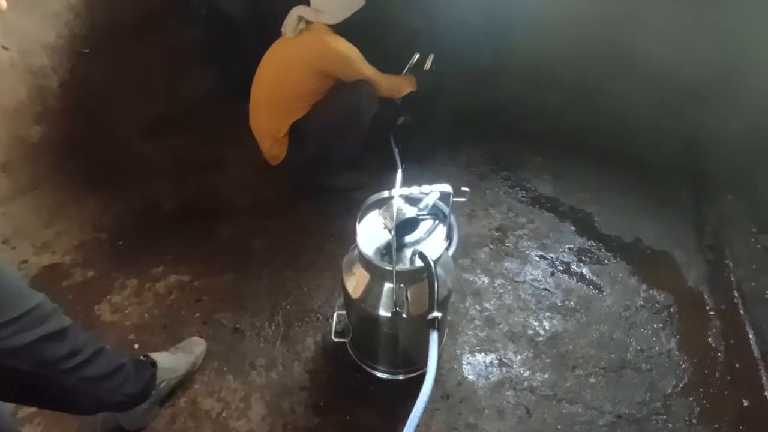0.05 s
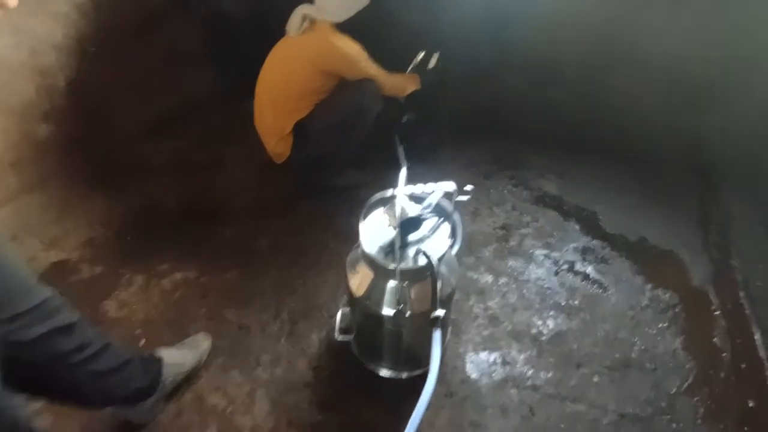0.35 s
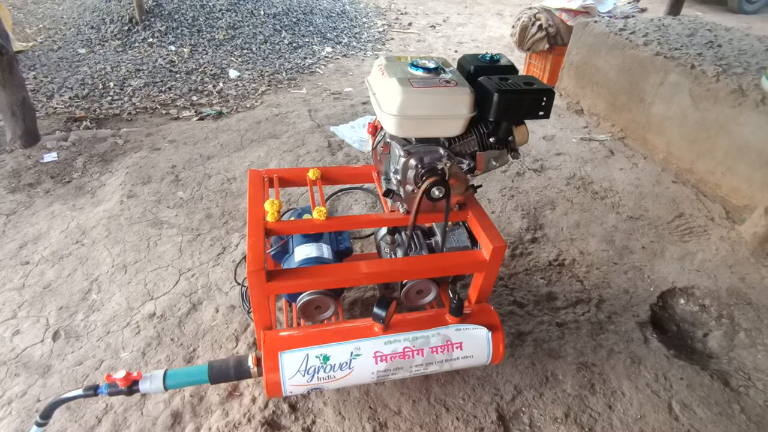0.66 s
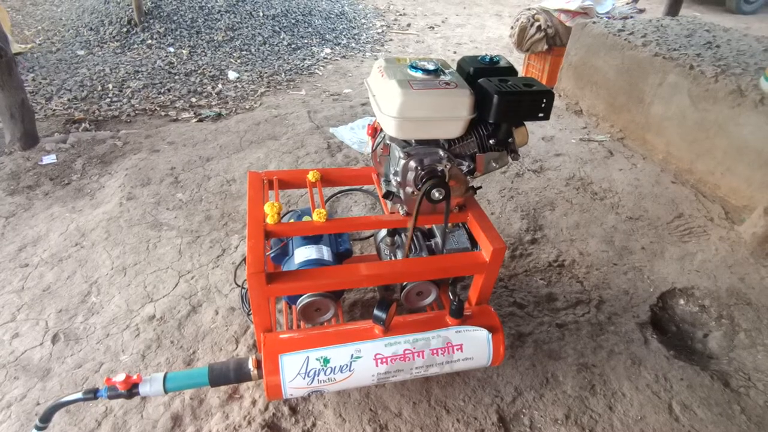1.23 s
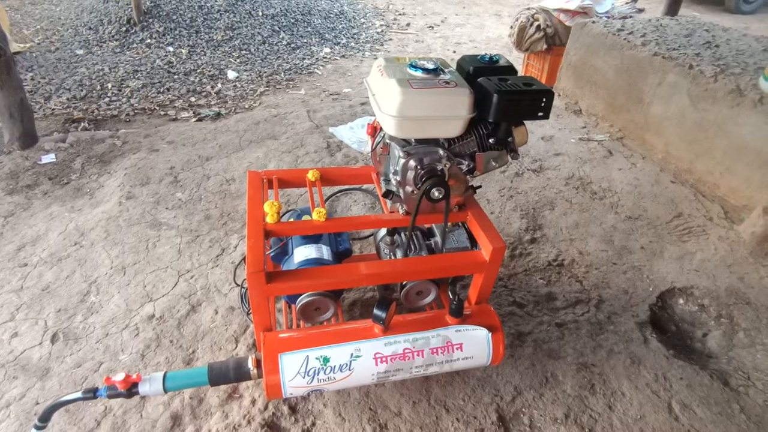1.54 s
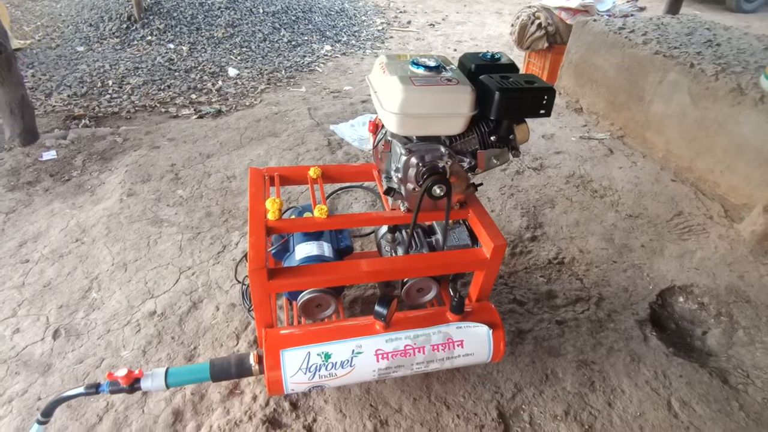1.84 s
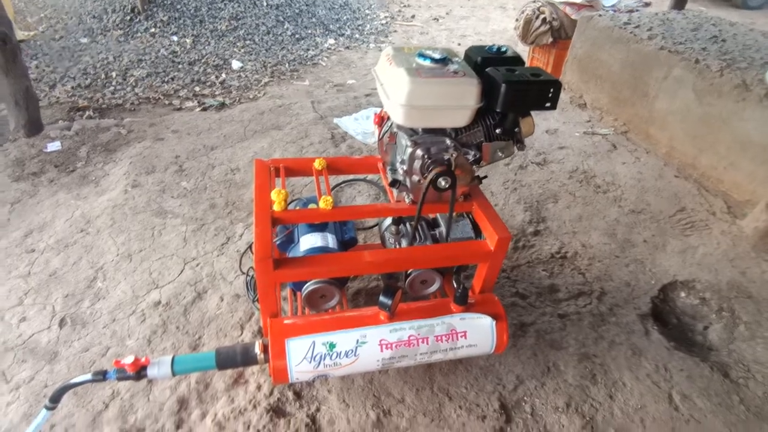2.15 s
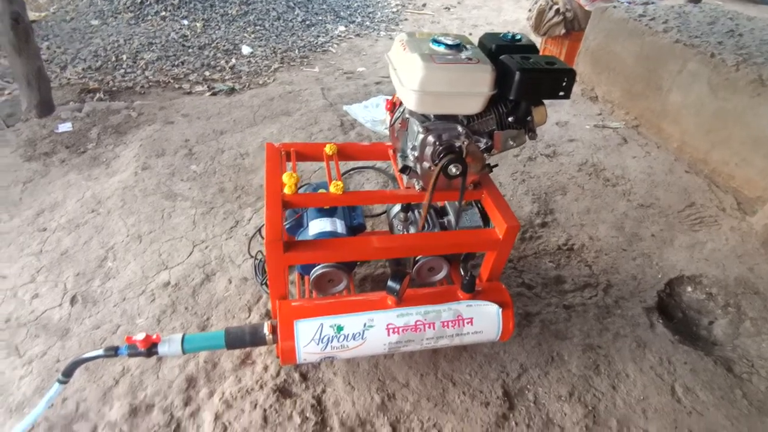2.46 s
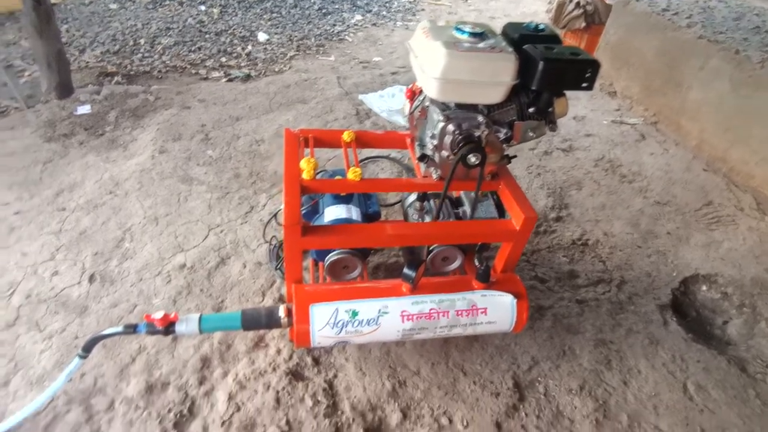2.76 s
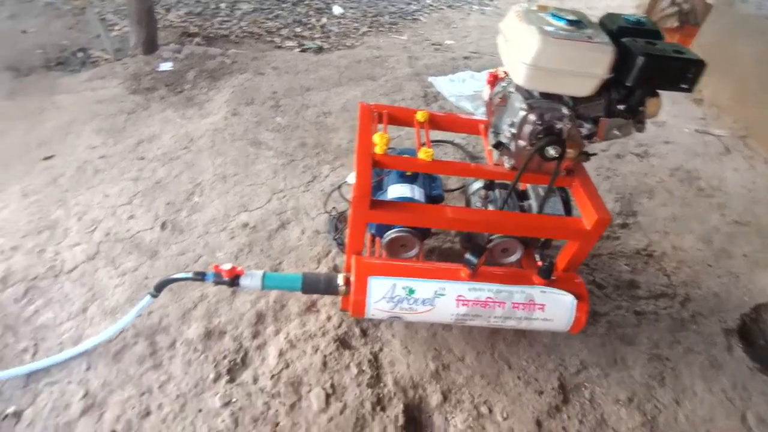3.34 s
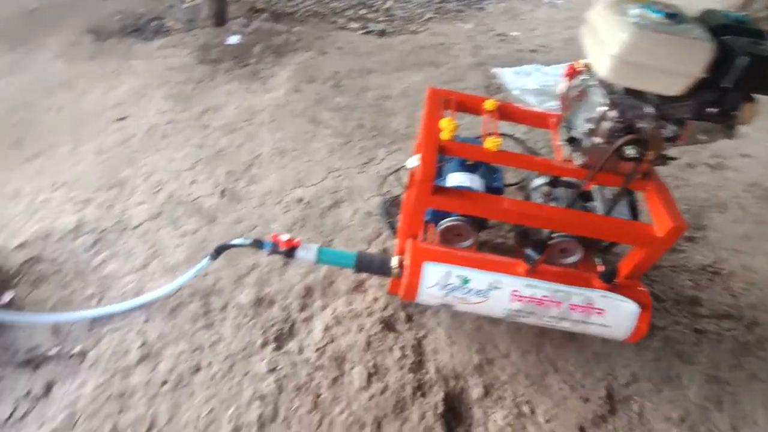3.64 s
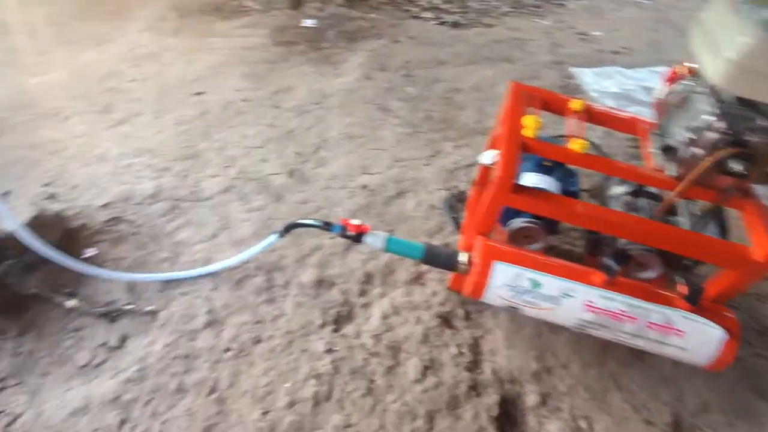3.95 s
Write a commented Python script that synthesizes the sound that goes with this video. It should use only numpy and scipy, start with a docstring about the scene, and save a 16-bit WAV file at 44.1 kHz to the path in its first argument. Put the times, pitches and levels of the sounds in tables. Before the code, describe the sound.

Loud, steady chugging of a small engine and pump cuts in after a short echoing clack.

```python
"""First a clack echoes in a milking shed and air hisses into a teat cup, the engine muffled by the wall.
Then a hard cut to the yard, next to the machine: a single-cylinder four-stroke chugs at governed speed.
Exhaust and intake puffs make its drone and rumble; valves and piston clatter and ring the covers.
It drives a vacuum pump whose tones beat slowly against the engine's own."""
import sys
import numpy as np
from scipy import signal
from scipy.fft import rfft, irfft, next_fast_len
from scipy.io import wavfile
from scipy.ndimage import map_coordinates

SR = 44100
rng = np.random.default_rng(int(sys.argv[2]) if len(sys.argv) > 2 else 0)


def to_wav(s):
    """Save 16-bit WAV."""
    ch = np.atleast_2d(s).T  # columns
    pcm = np.round(np.clip(ch, -1, 1) * 32767)  # PCM
    wavfile.write(sys.argv[1], SR, pcm.astype(np.int16))


N = 176400
CUT_S, FIRING_AT_S = .3805, .3822  # the cut to the yard; the firing that anchors the cycle

# Engine speed. Each row: time in seconds, firings per second.
FIRING_RATE = [(0.4, 21.027), (1.3, 21.129), (1.5, 21.231), (1.72, 21.01), (1.93, 21.177), (2.08, 21.115),
               (2.4, 21.235), (2.9, 21.179), (3.08, 21.105), (3.3, 21.244), (3.85, 20.99)]
# The drone's tones. Each row: multiple of the firing rate, base level in dB.
ENGINE_TONES = [(1, -42.9), (2, -34.9), (3, -47.7), (4, -36), (5, -32.1), (6, -35.9), (7, -47.8),
                (8, -34.5), (9, -41.9), (10, -37.3), (11, -42.0), (12, -32.6), (13, -45.7), (14, -37.7),
                (15, -30.8), (16, -38.7), (17, -42.9), (18, -37.9), (19, -36.1), (20, -45.4), (21, -42.8),
                (22, -42.2), (23, -43.9), (24, -35.3), (25, -41.0), (26, -40.8), (27, -36.8), (28, -36.3),
                (29, -41.6), (30, -44.1), (31, -42.9), (32, -44.1), (33, -40.0), (34, -36.9), (35, -41.5),
                (36, -43.9), (37, -39.4), (38, -43.4), (41, -50), (42, -50), (43, -45), (45, -47),
                (50, -41), (53, -46), (54, -44), (56, -48)]
# Exhaust and intake pushes. Each row: place in the cycle (0-1), signed size, ring in Hz, width in Hz.
PUFFS = [(-.002, .8, 230, 500), (.008, 2.4, 737, 109), (0.29, -1.1, 257, 147), (.306, -.9, 383, 169),
         (.657, 0.97, 135, 65), (.355, -1.8, 592, 15)]
# The silencer's boom as the listener moves. Each row: time in seconds, gain in dB.
BOOM_RIDE = [(.4, 1), (.9, 2.5), (1.5, 0), (2.2, 1.5), (2.7, -1.5), (3.3, -4), (4, -3)]
# Where the boom sits. Each row: frequency in Hz, share of that gain.
BOOM_BAND = [(200, 0.11), (300, 0.33), (430, 0.8), (500, 0.18)]
# Pump tones. Each row: multiple of the pump rate, level in dB, time of a dip in the beat in seconds.
PUMP_TONES = [(1, -36, .45), (2, -35.5, 1.3), (3, -43.7, 0.98), (6, -38, 1.07), (7, -38.5, 0.85)]
# Gas in the silencer and air box. Each row: frequency in Hz, relative level in dB.
RUMBLE_EQ = [(30, -20), (120, -10), (230, -8), (310, -2), (360, -6), (590, -0.5), (660, -5), (720, -2),
             (850, -7), (1010, -2.5), (1200, -5), (1450, -3), (1750, -3.5), (2200, -10), (2800, -24),
             (5000, -67)]
# Surges of that gas. Each row: place in the cycle, size, decay in seconds.
SURGES = [(0, 0.82, .005), (0.311, 0.72, 0.022)]
# Noise of the block. Each row: frequency in Hz, left and right relative levels in dB.
CLATTER_EQ = [(100, -72, -70), (1500, -37.5, -39), (2370, -4, -8.5), (2720, -8, -12), (3170, -6, -3),
              (3860, -7, -1.5), (4420, -8.5, -1), (5120, -10.5, -2.3), (5830, -13.5, -11), (6980, -14, -22),
              (8400, -11.5, -26), (10050, -19.5, -21), (11600, -26.5, -27), (15200, -28.5, -28.5)]
# Valve and piston knocks. Each row: place in the cycle, size, decay in seconds.
KNOCKS = [(.05, 0.92, 0.0079), (.25, 0.3, .009), (0.326, 0.94, .002), (.365, 1.15, 0.0017),
          (.43, .85, .001), (.5, 0.5, 0.009), (.67, .65, .001), (.86, .6, 0.0017)]
# The clatter as the listener moves. Each row: time in seconds, level in dB.
CLATTER_RIDE = [(.4, -23), (1.2, -22), (2.1, -22.5), (2.9, -23.3), (3.5, -24), (4, -26.3)]
# Cover rings. Each row: pitch in Hz, relative level in dB, t60 in seconds, lean to the right in dB.
COVER_MODES = [(1062, -9, .05, 0), (1360, -2, .03, 0), (1490, .5, .04, 0), (1730, 2.5, 0.042, 0),
               (1960, -4, .03, 0), (3250, -10, .04, 1), (3760, 0, 0.028, 1.5), (4500, -2, 0.008, 2),
               (8330, -10, 0.014, -2)]
# Swells of the hollow ring. Each row: place in the cycle, half-width in cycles, peak level in dB.
RING_SWELLS = [(.015, .045, -26), (.5, .135, -23.3)]
# The cluster's impact. Each row: frequency in Hz, relative level in dB.
CLACK_EQ = [(200, -16), (750, -12), (1300, -21), (2800, -13), (3800, 1), (4700, -8), (6500, -20),
            (9000, -36), (15000, -46)]
# Its ring. Each row: pitch in Hz, relative level in dB, t60 in seconds.
CLACK_MODES = [(2498, -21, .2), (2762, -22, .2), (3670, -8, .04), (3900, -8, .025), (4450, -15, 0.017),
               (6450, -25, .16)]
# Its echo in the shed. Each row: frequency in Hz, relative level in dB.
ECHO_EQ = [(120, -25), (220, 0), (370, 6), (520, -22), (1200, -15), (1750, -5), (2100, 1), (2600, -1.5),
           (3700, 3), (4500, -6), (5300, -12), (8000, -15.5), (15000, -41)]
# Air entering the teat cup. Each row: frequency in Hz, relative level in dB.
HISS_EQ = [(600, -14), (1500, -14), (2150, -11), (2520, -3), (3000, -12), (3800, -1), (4400, -3),
           (5200, -3), (7000, -8), (10000, -16), (15000, -12)]
# The suction's swell. Each row: time in seconds, gain in dB.
HISS_RIDE = [(0, -70), (.16, -60), (.21, -45), (.27, -44.5), (.33, -41), (.38, -42)]
# Whistles at the cup's lip. Each row: pitch in Hz, width in Hz, relative level in dB.
LIP_WHISTLES = [(3740, 110, 0), (5130, 70, -5), (5520, 60, -6), (5870, 80, -6)]
# Thuds through the wall. Each row: frequency in Hz, relative level in dB.
THUD_EQ = [(100, -27), (210, -3.5), (300, 4), (410, -6), (560, -36), (1200, -45)]
# The shed's room tone. Each row: frequency in Hz, relative level in dB.
ROOM_EQ = [(30, -2), (90, -13), (300, -5), (600, -7), (1000, -9), (2000, -15), (4000, -13), (8000, -22),
           (15000, -33)]
# The bounce off the ground. Each row: time in seconds, delay in seconds.
GROUND_DELAY = [(.4, .0046), (1.3, .0044), (2.3, 0.0044), (3, .004), (4, .0035)]
# The listener's slight turn. Each row: time in seconds, left ear's delay in seconds.
LEFT_DELAY = [(1.9, 0), (2.75, 0.0000087), (3.25, 0), (4, 0.000044)]
# Stereo image of the noise. Each row: frequency in Hz, left-right correlation.
EAR_LIKENESS = [(100, 0.84), (600, 0.77), (1100, 0.95), (1800, 0.71), (2800, 0.2), (12000, -0.14)]


def drone(cycle):
    """Exhaust and intake puffs line up the engine's drifting tones; the pump beats against them."""
    firing_hz = FIRING_RATE[0][1]
    tones = np.zeros(N)
    for order, db in ENGINE_TONES:
        boom_db = along(BOOM_BAND, order * firing_hz) * curve(BOOM_RIDE)
        drift_db = .025 * order * wobble(2.63)
        drift_rad = .006 * order * wobble(1.493)
        phase = 2 * np.pi * order * cycle + puff_phase(order) + drift_rad
        tones += amp(db + boom_db + drift_db) * np.cos(phase)
    strength = amp(.3 * wobble(firing_hz))  # no two firings are equally strong
    return np.sqrt(2) * (tones + vacuum_pump(cycle)) * strength


def puff_phase(order):
    """Phase that the ringing puffs of one cycle give to an engine tone."""
    tone_hz = order * np.mean(np.transpose(FIRING_RATE)[1])
    return np.angle(sum(size * np.exp(-2j * np.pi * order * place) * resonance(tone_hz, hz, width)
                        for place, size, hz, width in PUFFS))


def vacuum_pump(cycle, ratio=3.9917):
    """The pump runs just under four times the firing rate, so each tone slips past an engine tone."""
    out = np.zeros(N)
    for multiple, db, dip_s in PUMP_TONES:
        order = np.round(multiple * ratio)
        dip = np.interp(dip_s, clock(), cycle)
        turns = multiple * ratio * (cycle - dip) + order * dip
        out -= amp(db) * np.cos(2 * np.pi * turns + puff_phase(order))  # opposes the engine at the dip
    return out


def rumble(cycle, level_db=-25):
    """Turbulence surges with each puff and rings the silencer and air box."""
    gas = stereo_noise() * (3 + bursts(cycle, SURGES, scatter_db=.6))
    return amp(level_db) * unit(coloured(gas, RUMBLE_EQ))


def clatter(cycle, grit_db=1.5, frame_t60_s=.025):
    """Gritty fan and gear noise with knocks tied to the camshaft, ringing through the steel frame."""
    noise = stereo_noise() * (2.5 + bursts(cycle, KNOCKS, scatter_db=3.5))
    noise *= amp(grit_db * wobble(1400))
    t = np.arange(SR // 20) / SR
    frame = rng.standard_normal((2, len(t))) * amp(-60 * t / frame_t60_s)
    noise += .25 * signal.fftconvolve(noise, frame / np.linalg.norm(frame[0]), axes=1)[:, :N]
    ears = np.array([coloured(noise[ear], CLATTER_EQ, column=ear + 1) for ear in (0, 1)])
    return unit(ears) * amp(curve(CLATTER_RIDE))


def covers(cycle, gain_db=-25, spread_rad=.65):
    """Each knock rings the covers anew; they fade with the clatter as the listener moves."""
    t, out = np.arange(SR // 20) / SR, np.zeros((2, N))
    for hz, db, t60, pan_db in COVER_MODES:
        blows = sum(size * strikes(cycle, place, scatter_db=1.2) for place, size, _ in KNOCKS)
        wave = np.sin(2 * np.pi * hz * t + spread_rad * np.array([[1], [-1]]))
        ring = amp(db - 60 * t / t60) * wave * (1 - np.exp(-t * hz))
        out += signal.oaconvolve(blows[None], ring, axes=1)[:, :N] * pan(pan_db)
    ride_db = curve(CLATTER_RIDE)
    return out * amp(gain_db + ride_db - ride_db.mean())


def hollow_ring(cycle, hz=1012, scatter_db=.8, scatter_rad=.2):
    """One resonance answers the exhaust briefly and the intake at length."""
    firing_hz = FIRING_RATE[0][1]
    out = np.zeros(N)
    for place, width, db in RING_SWELLS:
        offset = (cycle - place + .5) % 1 - .5
        swell = np.exp(-.5 * (offset / width) ** 2) * amp(db + scatter_db * wobble(firing_hz))
        out += swell * np.sin(2 * np.pi * hz * offset / curve(FIRING_RATE) + scatter_rad * wobble(firing_hz))
    return out


def cluster_clack(start_s=.0413, hit_t60_s=.017, echo_t60_s=.41):
    """The milking cluster clacks once: a dry hit, a bright ring and the shed's echo."""
    age = np.maximum(clock() - start_s, 0)
    hit = rush(CLACK_EQ) * amp(-18 - 60 * age / hit_t60_s) * (age > 0)
    ring = sum(amp(db - 60 * age / t60) * np.sin(2 * np.pi * hz * age) for hz, db, t60 in CLACK_MODES)
    echo = rush(ECHO_EQ) * amp(-26.5 - 60 * age / echo_t60_s) * (1 - np.exp(-age / .004))
    return hit + amp(-18.5) * ring + echo


def suction(whistle_db=-4.5):
    """Air hisses into a teat cup and whistles at its lip."""
    def lip(f):
        return sum(amp(db) * resonance(f, hz, width) for hz, width, db in LIP_WHISTLES)
    hiss = rush(HISS_EQ)
    whistle = unit(filtered(stereo_noise(), lip))
    return (hiss + amp(whistle_db) * whistle) * amp(curve(HISS_RIDE))


def engine_through_wall(cycle, hum_hz=86):
    """The wall lets through only a dull thud each cycle and a throbbing hum."""
    thuds = unit(rush(THUD_EQ) * (.35 + bursts(cycle, [(.45, 1, .0094)], scatter_db=.5)))
    hum = np.sqrt(2) * np.sin(2 * np.pi * hum_hz * clock()) * (1 + .45 * np.cos(2 * np.pi * cycle))
    return amp(-49.5) * thuds + amp(-53) * hum


def room_tone():
    """A faint, steady bed of air in the shed."""
    return amp(-46) * rush(ROOM_EQ) * pan(1.75)


def with_ground_bounce(x, share=.17):
    """x with its reflection off the ground, which shifts as the listener moves."""
    earlier = np.maximum((clock() - curve(GROUND_DELAY)) * SR, 0).astype(int)
    return (x + share * x[:, earlier]) / np.hypot(1, share)


def strikes(cycle, place, scatter_db, jitter_cycles=.0015):
    """One impulse per cycle at this place, a little uneven in timing and force."""
    turns = np.arange(np.ceil(cycle[0]), cycle[-1])
    timing, force = rng.standard_normal((len(turns), 2)).T
    at = np.interp(turns + place + jitter_cycles * timing, cycle, np.arange(N)).astype(int)
    return np.bincount(at, amp(scatter_db * force) * (at < N - 1), N)


def bursts(cycle, table, scatter_db):
    """Envelope of decaying bursts that repeat with the cycle."""
    envelope = np.zeros(N)
    for place, size, decay_s in table:
        hits = strikes(cycle, place, scatter_db)
        envelope += size * signal.lfilter([1], [1, -np.exp(-1 / (SR * decay_s))], hits)
    return envelope


def rush(spectrum):
    """Coloured stereo noise of rms 1."""
    return unit(coloured(stereo_noise(), spectrum))


def stereo_noise():
    """White noise, alike in both ears in the bass and wide in the treble."""
    def mid_side(hz):
        angle = np.arccos(np.clip(along(EAR_LIKENESS, hz), -1, 1)) / 2
        return np.array([np.cos(angle), np.sin(angle)])
    mid, side = filtered(rng.standard_normal((2, N)), mid_side)
    return np.array([mid + side, mid - side])


def coloured(x, spectrum, column=1):
    """x through a minimum-phase EQ, which rings only after each hit."""
    def response(hz):
        cepstrum = irfft(np.log(amp(along(spectrum, hz, column))))
        half = len(cepstrum) // 2
        cepstrum[1:half] *= 2
        cepstrum[half + 1:] = 0
        return np.exp(rfft(cepstrum))
    return filtered(x, response)


def filtered(x, response):
    """x through a frequency response."""
    size = next_fast_len(N + SR // 2)
    return irfft(rfft(x, size) * response(np.fft.rfftfreq(size, 1 / SR)), size)[..., :N]


def resonance(f, hz, width):
    """Complex response at f of a band-pass centred on hz."""
    return 1j * f * width / (hz * hz - f * f + 1j * f * width)


def wobble(rate):
    """A smooth random curve, rate knots a second."""
    count = int(N * rate / SR) + 4
    knots = signal.resample(rng.standard_normal(count), count * 10)
    return np.interp(clock() * rate * 10, np.arange(len(knots)), knots)


def along(table, hz, column=1):
    """A column of a spectrum table, read on a log frequency axis."""
    columns = np.transpose(table)
    return np.interp(np.log(hz + 1), np.log(columns[0] + 1), columns[column])


def curve(points):
    """(seconds, value) points joined up at every sample."""
    return np.interp(clock(), *np.transpose(points))


def clock():
    """Time of every sample."""
    return np.arange(N) / SR


def pan(db):
    """Gains that lean to the right."""
    return amp(np.array([[-db], [db]]))


def amp(db):
    """Decibels to gain."""
    return 10 ** (np.asarray(db) / 20)


def unit(x):
    """Scale to rms 1."""
    return x / np.sqrt(np.mean(x ** 2) + 1e-20)


def scene():
    """The shed, then the yard, where the listener turns slightly toward the end."""
    t = clock()
    cycle = np.cumsum(curve(FIRING_RATE)) / SR  # whole numbers are firings
    cycle -= np.interp(FIRING_AT_S, t, cycle)
    cycle += .001 * wobble(9)  # the crank runs early and late
    yard = (drone(cycle) + hollow_ring(cycle)) * pan(.3)
    yard += with_ground_bounce(rumble(cycle) + clatter(cycle) + covers(cycle))
    yard[0] = map_coordinates(yard[0], [(t - curve(LEFT_DELAY)) * SR])
    shed = engine_through_wall(cycle) + (cluster_clack() + suction()) * pan(2.5) + room_tone()
    return np.where(t < CUT_S, shed, yard)


def record(dry, top_hz=15700):
    """A brick-wall high cut takes off the very top."""
    return filtered(dry, lambda hz: hz < top_hz)


dry = scene()
out = record(dry)
to_wav(out)
```